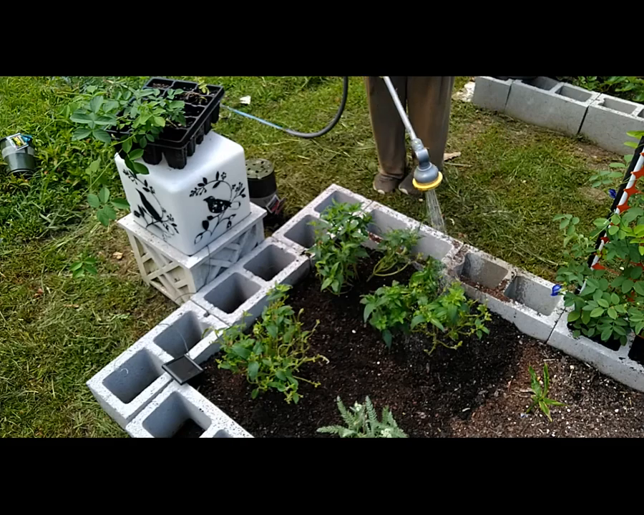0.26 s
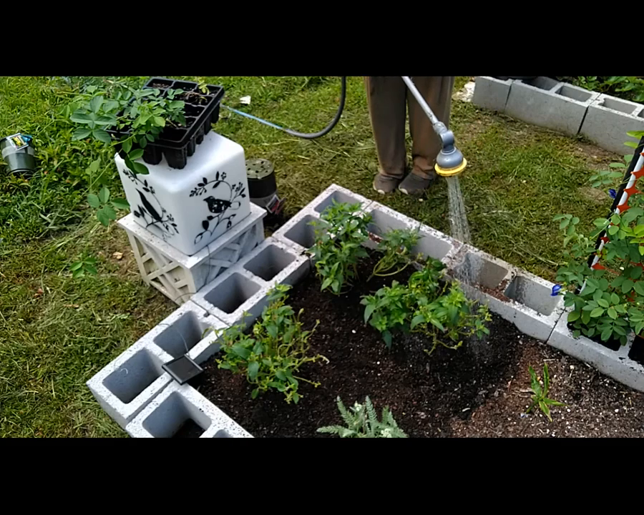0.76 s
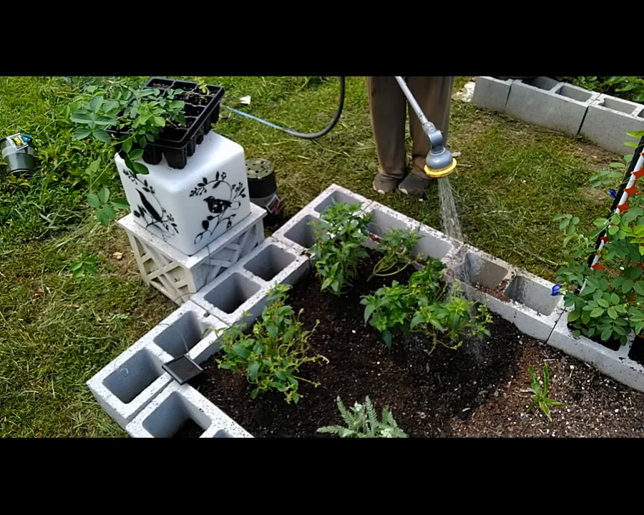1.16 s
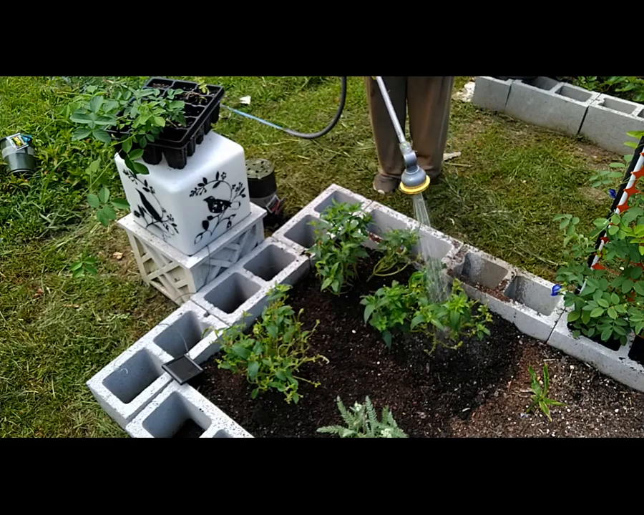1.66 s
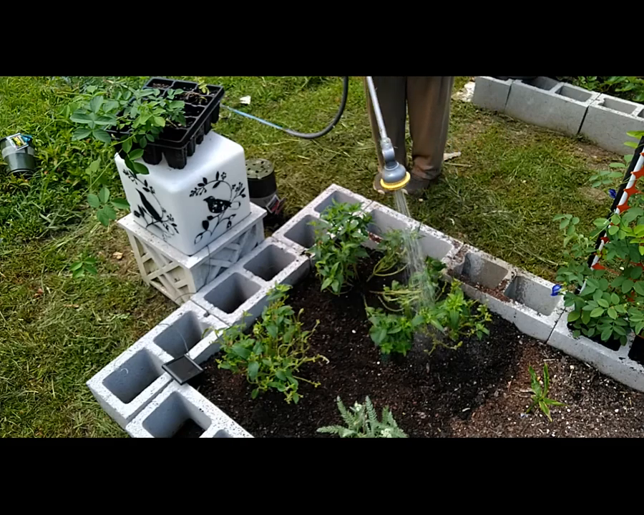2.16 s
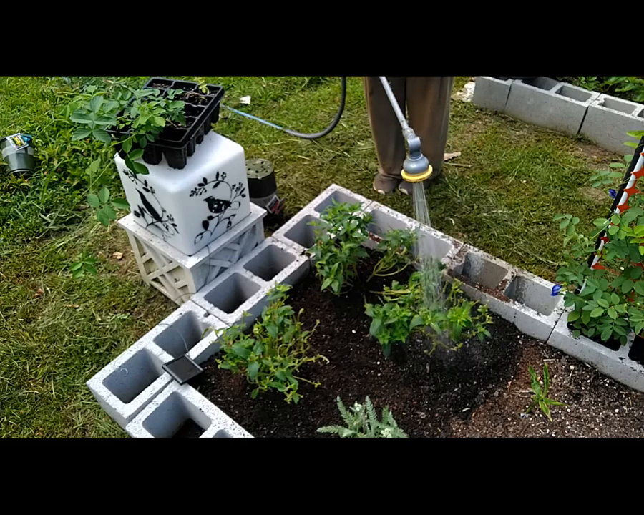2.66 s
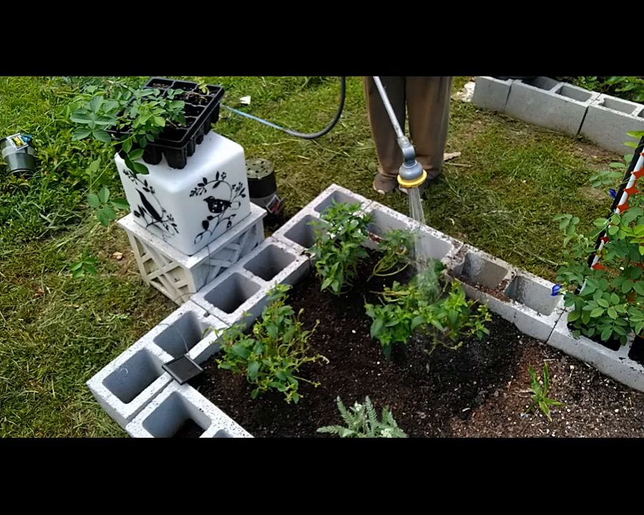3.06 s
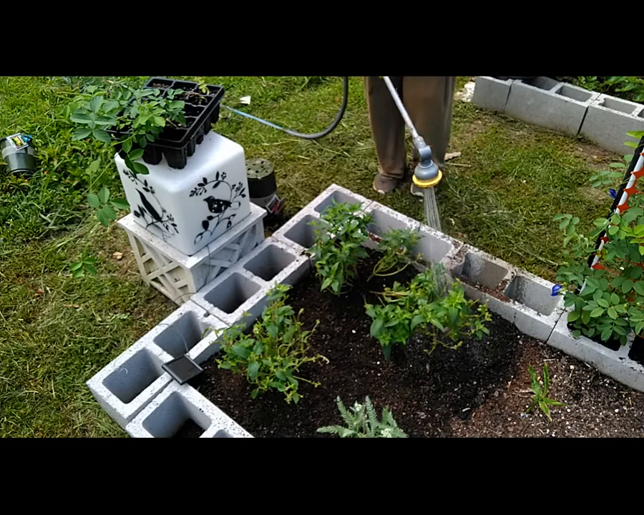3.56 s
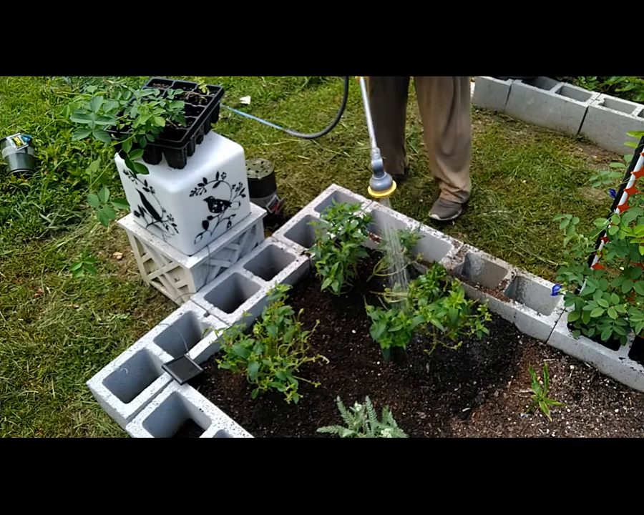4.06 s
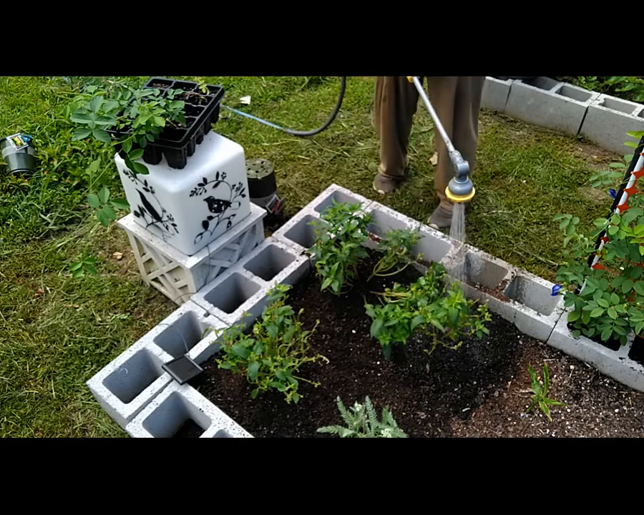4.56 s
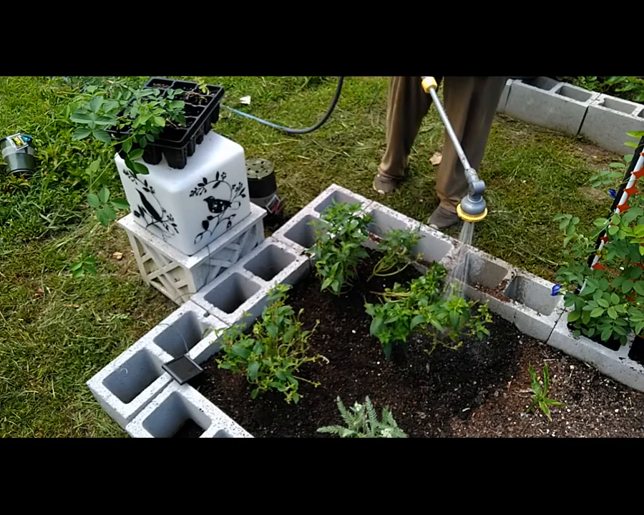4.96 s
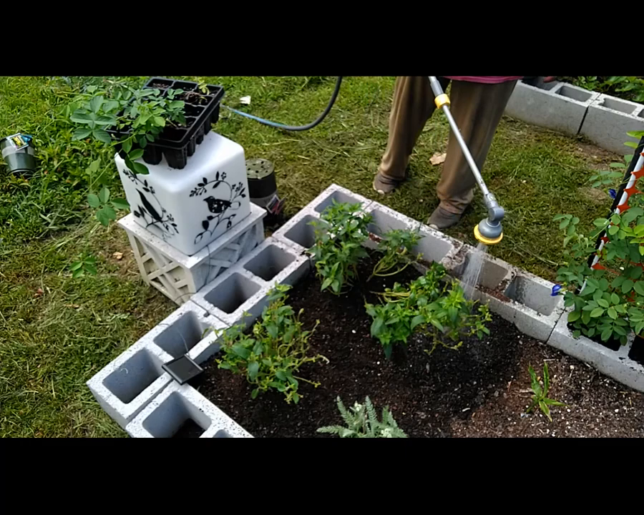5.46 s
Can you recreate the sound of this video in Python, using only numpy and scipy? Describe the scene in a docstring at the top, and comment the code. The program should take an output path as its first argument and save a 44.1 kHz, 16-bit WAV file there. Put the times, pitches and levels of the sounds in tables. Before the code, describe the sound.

In an open garden, a hose wand showers a raised bed close to a stereo microphone. From 0 to about 1.5 s the spray is a fine, fairly quiet, airy hiss on bare soil, with faint high ringing from the spray head and a thin, breathy valve whistle joining near 0.9 s. Around 1.6 s it swings onto plants and quickly becomes a much louder, bright, dense patter of drops on leaves, steady to the end at about 5.7 s, with single fat ticks near 1.9, 2.1, 3.0, 3.2, 3.8, 4.1 and 4.9 s. Distant road rumble lies beneath. A bird gives a short arched note and a long falling whistle at 3.2-3.9 s, repeated more clearly from 4.1 s after a high chip, and again from 5.0 s. A low vehicle drone swells around 4.3-5.4 s, then fades. Grass crackles softly underfoot near 4.8 and 5.3 s.

```python
"""In a garden, a hose wand showers a raised bed: fine jets of chance impacts hiss, the rose rings faintly
and the valve whistles, then the spray swings from bare soil onto plants and thousands of drops patter on leaves.
A songbird gives a chip, short arches and three long falling whistles built from gliding sines.
A vehicle drones past some way off as low harmonics over rumble and rush; a foot crackles in the grass."""
import sys
import numpy as np
from scipy import signal
from scipy.fft import rfft, irfft
from scipy.io import wavfile
from scipy.ndimage import map_coordinates

SR = 44100
rng = np.random.default_rng(int(sys.argv[2]) if len(sys.argv) > 2 else 0)


def master(y):
    """Save y as 16-bit WAV."""
    cut = np.clip(np.atleast_2d(y).T, -1, 1)
    pcm = np.round(cut * 32767)  # scale
    wavfile.write(sys.argv[1], SR, pcm.astype(np.int16))


N = 252252
T = np.arange(N) / SR
HZ = np.maximum(np.arange(N // 2 + 1) * SR / N, 1)
SIDES = np.array([[1], [-1]])  # left, right

# Tyre rush of the far roads, dying down. Each row: time in seconds, level in dB before a trim.
FAR_RUSH = [(0, -63), (1.3, -62), (2.7, -64), (3.3, -66), (5.7, -68.5)]
# Rumble of the far roads. Each row: time in seconds, level in dB.
FAR_RUMBLE = [(0, -59), (.8, -61.5), (1.9, -57), (2.6, -57.5), (3.3, -60.5), (3.8, -56), (5.7, -55.5)]
# Spectrum of the road rumble. Each row: frequency in Hz, relative level in dB.
RUMBLE_COLOUR = [(20, -28), (36, -28), (52, -6), (75, -0.5), (115, 0), (160, 0), (200, -11), (300, -24)]
# Spectrum of the tyre rush. Each row: frequency in Hz, relative level in dB.
RUSH_COLOUR = [(120, -8), (220, 1), (330, -2), (480, 1), (720, -0.5), (1000, -6), (1500, -11),
               (3000, -10.5), (6000, -42)]
# Faint steady hum tones. Each row: centre frequency in Hz, level in dB.
HUM_TONES = [(595, -83), (714, -78), (774, -85), (1012, -87.5), (1072, -83.5)]
# The vehicle at its nearest: full from in seconds, full until in seconds, boost in dB, rise and fall in dB per s.
PASS_SWELL = (4.5, 5, 1, 35, 49)
# Passing engine. Each row: time in seconds, firing rate in Hz before its waver.
ENGINE_HZ = [(3.8, 75.6), (4.65, 78.4), (4.95, 75.5), (5.4, 74.36)]
# Exhaust tones of that engine. Each row: time in seconds, firing tone in dB, octave in dB, both before trims.
EXHAUST = [(4.0, -64, -57.5), (4.046, -52, -62), (4.206, -60, -59), (4.31, -49, -55.5), (4.595, -47.5, -37),
           (4.642, -55, -47), (4.698, -55, -43.5), (5.054, -37, -51.5), (5.13, -38.5, -45),
           (5.388, -39, -47.5), (5.57, -58, -55), (5.72, -68, -61)]

# Short arched bird notes. Each row: start in seconds, level in dB, pitch factor.
ARCHES = [(3.188, -61, 1.06), (4.169, -51, 0.98), (4.991, -49, 1.01)]
# Long falling whistles. Each row: start in seconds, level in dB, pitch factor.
FALLS = [(3.45, -68, 0.98), (4.328, -53, 1.0), (5.145, -54, 0.98)]
# High chip. Each row: start in seconds, level in dB, pitch factor.
CHIPS = [(4.09, -50, 1.0)]
# Shape of the arch. Each row: seconds after the start, Hz before the pitch factor, dB against the note.
ARCH_SHAPE = [(0, 2700, -9), (.012, 3090, -1), (0.02, 3280, 4), (0.032, 3274, 5), (.04, 3030, 4),
              (.047, 2870, -13)]
# Shape of the chip. Each row: seconds after the start, Hz before the pitch factor, dB against the note.
CHIP_SHAPE = [(0, 7500, -8), (.012, 6600, 4), (.028, 5900, -5), (.05, 5200, -17), (.06, 5000, -35)]
# Shape of the falling whistle, which sinks in steps and breaks midway.
# Each row: seconds after the start, Hz before the pitch factor, dB against the note.
FALL_SHAPE = [(0, 2735, -9), (.025, 2684, 3), (.075, 2493, 5), (.11, 2340, 4), (.138, 2278, -1),
              (.152, 2244, -14), (.165, 2200, 0), (.197, 2032, -2.5), (.245, 1930, -3.5), (.31, 1790, -9),
              (.39, 1730, -16.5), (.48, 1615, -25)]
# The song glancing off nearby things. Each row: delay in seconds, level in dB.
BIRD_ECHOES = [(.0041, -14), (.0113, -11)]

# Foot brushing the grass. Each row: middle in seconds, Gaussian spread in seconds, centre in Hz, level in dB.
STEPS = [(4.802, 0.072, 2670, -58.5), (5.32, 0.14, 2450, -56.5)]

# Bands of the spray hiss on the block wall. Each row: centre in Hz, half-width in Hz, mean level in dB.
WALL_RINGS = [(4020, 520, -68.5), (4520, 180, -69), (5190, 210, -65.5)]
# Spatter bands on bare soil. Each row: centre in Hz, half-width in Hz, mean level in dB.
SOIL_RINGS = [(4460, 300, -70.5), (5096, 130, -70), (7100, 500, -68)]
# Level of the 4-5.2 kHz spray hiss: full from in seconds, full until in seconds, level in dB,
# rise and fall in dB per s.
HISS_SWELL = (1.9, 4.2, 0, 18, 32)
# Jets on bare soil: full from in seconds, full until in seconds, level in dB, rise and fall in dB per s.
SOIL_SWELL = (0, 0.44, 0, 0, 16)

# Upper valve whistle: full from in seconds, full until in seconds, level in dB, rise and fall in dB per s.
UPPER_SWELL = (.88, 4.4, -65.2, 29, 22)
# Lower valve whistle: full from in seconds, full until in seconds, level in dB, rise and fall in dB per s.
LOWER_SWELL = (4.25, 5.63, -65.8, 6, 25)
# Pitch of the lower whistle, which sags for a while. Each row: time in seconds, frequency in Hz.
LOWER_PITCH = [(2.8, 1425), (3.9, 1311), (4.5, 1375), (5.4, 1392)]

# Resonances of the rose. Each row: centre in Hz, half-width in Hz, level in dB before the swell.
ROSE_RINGS = [(6460, 140, -73.5), (6870, 170, -68), (7570, 150, -66), (8480, 180, -70), (8960, 150, -70.5)]
# Ringing of the rose: full from in seconds, full until in seconds, level in dB, rise and fall in dB per s.
RING_SWELL = (0.9, 3.3, 0.5, 4, 1)
# Spectrum of the fine jets. Each row: frequency in Hz, relative level in dB.
JET_COLOUR = [(650, -14), (1100, -16), (1290, -22), (1450, -12.5), (1770, -14), (2010, -15.5),
              (2370, -17.5), (3400, -13), (4880, -11), (6030, -8.5), (7620, -5), (10800, -8), (13000, -3.5),
              (15700, -8)]

# Single fat drops on a leaf. Each row: time in seconds, peak of the tick in dB.
SPLATS = [(1.9112, -28), (2.1183, -25), (3.0086, -22.5), (3.2485, -21), (3.7894, -28.5), (4.121, -28.5),
          (4.928, -28.5)]

# The spray sweeping over the plants. Each row: time in seconds, patter level in dB before the layer levels.
PATTER = [(1.68, -45.5), (1.76, -44), (2.29, -45), (2.37, -47), (3.03, -43.5), (3.2, -43), (3.31, -46),
          (3.72, -44), (3.95, -44.5), (4.31, -42.5), (4.49, -44.5), (4.82, -45), (5.08, -44), (5.4, -44.5),
          (5.6, -46), (5.72, -45.5)]
# Bands of the spray drumming among the plants. Each row: centre in Hz, half-width in Hz, dB against the patter.
PLANT_RINGS = [(6940, 150, -16), (7600, 90, -15)]
# Spectrum of drops on leaves. Each row: frequency in Hz, relative level in dB.
LEAF_COLOUR = [(1350, -32), (2300, -19), (2590, -19), (2810, -14.5), (3150, -22), (3580, -30.5),
               (4270, -36), (4780, -31), (5180, -19), (5610, -16), (6500, -7), (7300, -2), (7900, 3),
               (8800, 1.5), (11600, -4.5), (12900, -2), (14400, -2.5), (15700, -8.5)]
# Spectrum of the run-off on soil. Each row: frequency in Hz, relative level in dB.
SOIL_COLOUR = [(600, -20), (1000, 1.5), (1600, 1), (2400, 4.5), (3300, -3.5), (5000, -6.5), (8000, -1.5)]

# Likeness of left and right. Each row: frequency in Hz, likeness from 0 to 1.
LIKENESS = [(60, .99), (130, .94), (290, .85), (560, .22), (1400, .68), (2100, .6), (3300, .5), (5200, 0),
            (6200, .5), (7100, .965), (15000, .98)]
# Phase between left and right. Each row: frequency in Hz, radians by which left leads.
LEAD = [(340, 0), (1290, 1.58), (2100, 0.84), (2800, 1.87), (3900, 2.5), (5900, 4), (6900, 0)]
# Balance of left and right. Each row: frequency in Hz, left against right in dB.
SIDE_BALANCE = [(60, 0), (110, -1.5), (200, -0.5), (380, -0.5), (700, -1.0), (1290, -0.5), (2380, -1),
                (4400, 2), (8120, -2), (15000, -5.5)]

CUTOFF_HZ = 15800
# The spray swings onto the leaves, gaining level evenly until it is fully on them
ON_LEAVES_S, SWING_DB_PER_S = 1.67, 66
UPPER_HZ, WHISTLE_WANDER_HZ = 2023, 26
# The lower whistle flares up once; the length is a Gaussian spread
FLARE_S, FLARE_LENGTH_S, FLARE_DB = 5.4, .085, 8
# The jets are heard again off the ground, with a delay that shifts as the wand sways
GROUND_DELAY_S, GROUND_SWAY_S, GROUND_ECHO_DB = .0013, .00005, -11


def from_db(db):
    """Decibels to gain."""
    return 10 ** (np.asarray(db) / 20)


def rms_one(x):
    """Scale to unit power."""
    return x / np.sqrt(np.mean(x ** 2) + 1e-20)


def in_time(rows, t=T):
    """Each column of a curve, joined by straight lines."""
    s, *columns = np.transpose(rows)
    return [np.interp(t, s, c) for c in columns]


def over_hz(points):
    """A table joined by straight lines on a log-frequency axis."""
    hz, value = np.transpose(points)
    return np.interp(np.log(HZ), np.log(hz), value)


def colour(points):
    """Gain of a spectrum that falls away steeply past its ends."""
    below = (.8 * points[0][0] / HZ) ** 8
    above = (.8 * HZ / points[-1][0]) ** 8
    return from_db(over_hz(points)) / np.sqrt(1 + below + above)


def resonance(hz, width_hz):
    """Gain of one resonance, 1 on top and half at the given width to either side."""
    return 1 / (1 + ((HZ - hz) / width_hz) ** 2)


def gaussian(middle_s, spread_s):
    """Bell-shaped level over time, 1 at its middle."""
    return np.exp(-.5 * ((T - middle_s) / spread_s) ** 2)


def swell(start, end, level_db, rise_db_per_s, fall_db_per_s, t=T):
    """Level in dB of something that rises, holds and falls away."""
    rise = rise_db_per_s * np.maximum(start - t, 0)
    fall = fall_db_per_s * np.maximum(t - end, 0)
    return level_db - rise - fall


def drift(rate):
    """Slow chance with spread 1, drawn once a millisecond and smoothed above the rate in Hz."""
    count = N * 1000 // SR + 2
    hz = np.arange(count // 2 + 1) * 1000 / count
    slow = irfft(rfft(rng.standard_normal(count)) / (1 + (hz / rate) ** 2), count)
    return np.interp(T * 1000, np.arange(count), rms_one(slow))


def noise():
    """Two unrelated white noises."""
    return rng.standard_normal((2, N))


def drops(per_s, size_db):
    """Impacts at random moments, their sizes spread by chance in dB and their signs random."""
    sizes = from_db(size_db * np.minimum(rng.exponential(1, (2, N)), 6))
    signs = rng.choice([-1, 1], (2, N))
    return sizes * signs * (rng.random((2, N)) < per_s / SR)


def turns(hz):
    """Running phase in radians of a moving frequency."""
    return 2 * np.pi * np.cumsum(hz) / SR


def sides_mix():
    """Per frequency, how the shared and the unshared part of a sound reach left and right."""
    alike, lead = np.clip(over_hz(LIKENESS), 0, .995), over_hz(LEAD)
    path = np.exp(.5j * SIDES * lead) / np.sqrt(1 + alike * np.cos(lead))
    return path * np.sqrt(1 + alike), path * SIDES * np.sqrt(1 - alike)


SHARED, APART = sides_mix()


def spread(pair, gain):
    """Colour two unrelated signals and mix them into a partly alike left and right; their middle has rms 1."""
    shared, apart = rfft(pair) * gain
    out = irfft(shared * SHARED + apart * APART, N)
    return out / np.std(out.mean(axis=0))


def wandering(hz, width_hz, offset_hz):
    """Noise in one resonance whose centre moves by an offset over time."""
    band = signal.hilbert(spread(noise(), resonance(hz, width_hz)))
    return np.real(band * np.exp(1j * turns(offset_hz)))


def street(rush_db=0.5, near_rumble_db=-49, near_rush_db=-60.0, lumpy_db=2.5):
    """Low rumble and tyre rush from the roads, swelling as the vehicle passes, with faint steady hum tones over
    it."""
    near = from_db(swell(*PASS_SWELL))
    far_rumble = from_db(in_time(FAR_RUMBLE)[0] + lumpy_db * drift(8.7))
    far_rush = from_db(in_time(FAR_RUSH)[0] + rush_db)
    # far and near traffic add as powers
    rumble_level = np.hypot(far_rumble, near * from_db(near_rumble_db))
    rush_level = np.hypot(far_rush, near * from_db(near_rush_db))
    rumble = rumble_level * spread(noise(), colour(RUMBLE_COLOUR))
    rush = rush_level * spread(noise(), colour(RUSH_COLOUR))
    hum = sum(from_db(db) * np.sqrt(2) * np.sin(turns(hz + 2 * drift(4.96))) for hz, db in HUM_TONES)
    return rumble + rush + hum


def engine(firing_db=0.4, octave_db=0.5, third_db=-28, waver=0.0063, rough_db=1.65, lead=0.08):
    """Only the lowest exhaust orders carry this far; they waver on the way and lead in phase on the left."""
    first_db, second_db = in_time(EXHAUST)
    phase = turns(in_time(ENGINE_HZ)[0] * (1 + waver * drift(14.0))) + lead * SIDES
    near = np.interp(T, [3.3, 4.3], [.2, 1])
    levels = [first_db + firing_db, second_db + octave_db, second_db + third_db]
    orders = sum(from_db(db + rough_db * drift(14)) * np.sin(k * phase) for k, db in enumerate(levels, 1))
    return near * np.sqrt(2) * orders


def song(notes, shape, flutter_db, rasp):
    """One kind of note, a gliding whistle whose strength flutters and whose pitch trembles quickly."""
    out, tremble = np.zeros(N), 1 + rasp * drift(156.5)
    for start, level_db, pitch in notes:
        hz, db = in_time(shape, T - start)
        sounding = (T > start) & (T < start + shape[-1][0])
        strength = from_db(level_db + db + flutter_db * drift(63))
        out += sounding * strength * np.sin(turns(hz * pitch * tremble))
    return np.sqrt(2) * out


def bird(echo_db=-12, echo_t60=1.0):
    """The song arrives directly, made uneven by near reflections and scattered back by trees and houses."""
    notes = song(ARCHES, ARCH_SHAPE, flutter_db=2.0, rasp=0.0115)
    notes += song(FALLS, FALL_SHAPE, flutter_db=2.5, rasp=.004)
    notes += song(CHIPS, CHIP_SHAPE, flutter_db=1.0, rasp=0.00467)
    notes = notes + sum(from_db(db) * np.interp(T - delay, T, notes) for delay, db in BIRD_ECHOES)
    # one second of decaying noise after a 15 ms gap, scaled to unit energy
    scatter = noise()[:, :SR] * from_db(-60 * T[:SR] / echo_t60) * (T[:SR] > .015)
    scatter /= np.sqrt(np.sum(scatter ** 2, axis=1, keepdims=True))
    direct = irfft(rfft(notes) * np.exp(.5j * SIDES * over_hz(LEAD)), N)
    return direct + from_db(echo_db) * signal.fftconvolve(scatter, notes[None], axes=1)[:, :N]


def steps(width_hz=480):
    """Grass blades crackle under a shifting shoe: dense impacts in one resonance, swelling and fading."""
    out = 0
    for s, length, hz, db in STEPS:
        crackle = spread(drops(3000, 3.3), resonance(hz, width_hz))
        out = out + from_db(db) * gaussian(s, length) * crackle
    return out


def spatter(rings, level, wander_db=2.3, sway_hz=60):
    """Jets striking a surface hiss in bands that shift with the spot they hit."""
    bands = 0
    for hz, width, db in rings:
        strength = from_db(db + wander_db * drift(6.9))
        bands = bands + strength * wandering(hz, width, sway_hz * drift(2.5))
    return from_db(swell(*level)) * bands


def whistle(hz, level_db, width_hz):
    """Turbulence in a narrow passage sings a breathy note whose centre wanders."""
    middle = np.mean(hz)
    return from_db(level_db) * wandering(middle, width_hz, hz - middle)


def wand(waver_db=0.75):
    """The two whistles of the valve, wavering in pitch and strength."""
    upper_db = swell(*UPPER_SWELL) + waver_db * drift(3)
    flare_db = FLARE_DB * gaussian(FLARE_S, FLARE_LENGTH_S)
    lower_db = swell(*LOWER_SWELL) + waver_db * drift(5.5) + flare_db
    upper = whistle(UPPER_HZ + WHISTLE_WANDER_HZ * drift(3.05), upper_db, width_hz=64)
    return upper + whistle(in_time(LOWER_PITCH)[0], lower_db, width_hz=46)


def rose(jet_db=-57, wander_db=2.0, sway_hz=95):
    """Fine jets hiss through the holes, echo off the ground and excite head resonances that drift as it sways."""
    hiss = from_db(jet_db) * spread(drops(9000, 2.9), colour(JET_COLOUR))
    delay = GROUND_DELAY_S + GROUND_SWAY_S * drift(0.57)
    echo = np.array([map_coordinates(side, [(T - delay) * SR]) for side in hiss])
    rings = 0
    for hz, width, db in ROSE_RINGS:
        strength = from_db(db + wander_db * drift(1.5))
        rings = rings + strength * wandering(hz, width, sway_hz * drift(1.5))
    return hiss + from_db(GROUND_ECHO_DB) * echo + from_db(swell(*RING_SWELL)) * rings


def splats(splash_s=.001, splash_db=-12.5):
    """A fat drop slaps a leaf: one bright tick, then a tiny splash."""
    clicks, splash_level = np.zeros(N), np.zeros(N)
    for s, db in SPLATS:
        clicks[int(s * SR)] = from_db(db)
        splash_level += from_db(db + splash_db) * (T >= s) * np.exp(-np.abs(T - s) / splash_s)
    splash = splash_level * rng.standard_normal(N)
    bright = signal.butter(2, [7000, 15500], "band", fs=SR, output="sos")
    tick = signal.sosfilt(bright, signal.unit_impulse(64))
    return np.convolve(clicks / np.abs(tick).max() + splash, tick)[:N]


def leaves(per_s=15000, size_db=2.0, flutter_db=0.61, leaf_db=-.5, top_db=-5.0, soil_db=-20.5, split_hz=11000):
    """Drops tick on swaying leaves, and the run-off spatters more dully on the soil."""
    level_db = in_time(PATTER)[0] - SWING_DB_PER_S * np.maximum(ON_LEAVES_S - T, 0)
    hits = drops(per_s, size_db)
    top = 1 / (1 + (split_hz / HZ) ** 16)  # share of the treble above the split
    body = from_db(leaf_db) * spread(hits, colour(LEAF_COLOUR) * (1 - top))
    spray = from_db(top_db) * spread(hits, colour(LEAF_COLOUR) * top)
    soil = from_db(soil_db) * spread(drops(2500, 3.3), colour(SOIL_COLOUR))
    ring = sum(from_db(db) * spread(noise(), resonance(hz, width)) for hz, width, db in PLANT_RINGS)
    return from_db(level_db + flutter_db * drift(19)) * (body + spray + soil + ring)


def scene():
    """The neighbourhood behind, the watering close by."""
    behind = street() + engine() + bird()
    surfaces = spatter(WALL_RINGS, HISS_SWELL) + spatter(SOIL_RINGS, SOIL_SWELL)
    return behind + steps() + surfaces + wand() + rose() + splats() + leaves()


def record(dry):
    """Left and right differ in tone, the right having more of the highest treble; the top is cut steeply."""
    balance = from_db(.5 * SIDES * over_hz(SIDE_BALANCE))
    low_pass = np.clip((CUTOFF_HZ - HZ) / 120 + .5, 0, 1)
    return irfft(rfft(dry) * balance * low_pass, N)


dry = scene()
out = record(dry)
master(out)
```